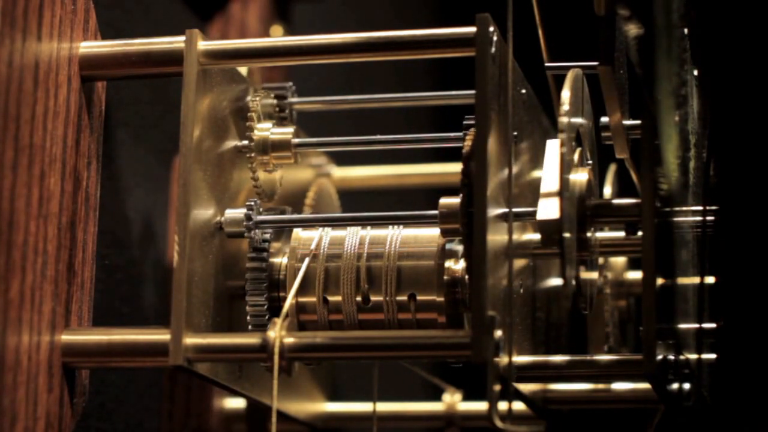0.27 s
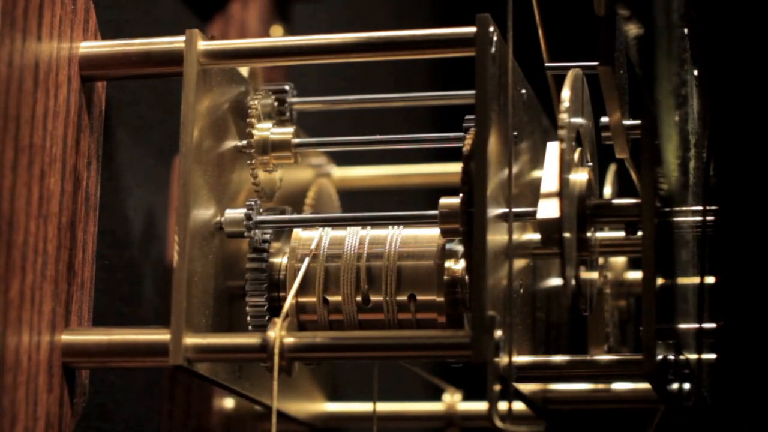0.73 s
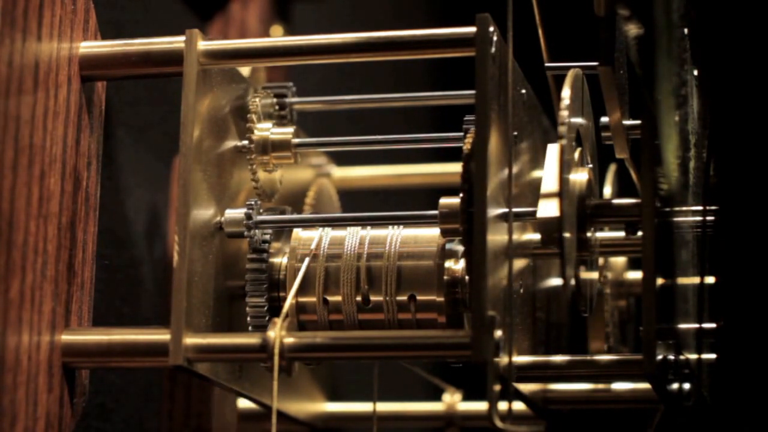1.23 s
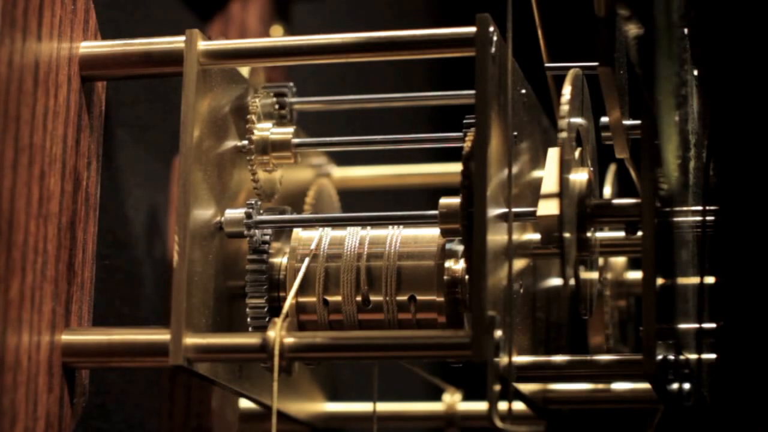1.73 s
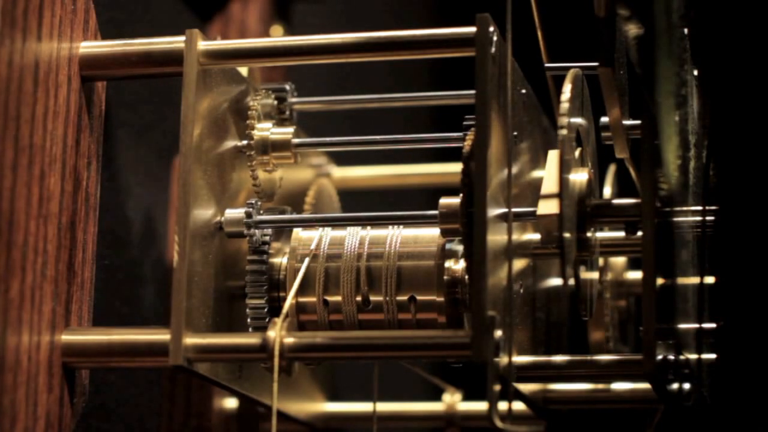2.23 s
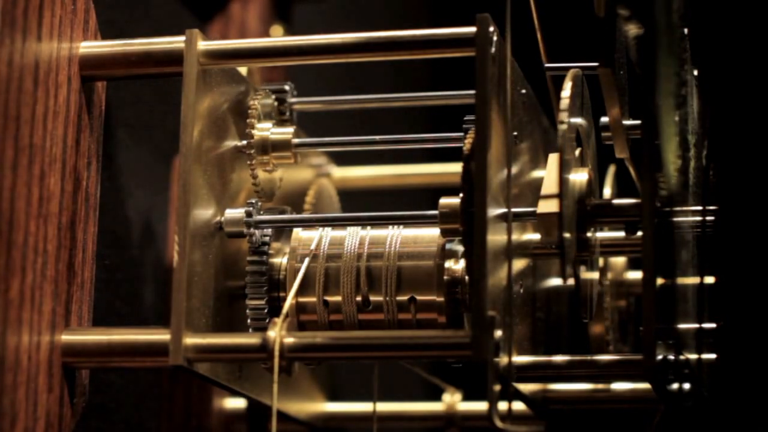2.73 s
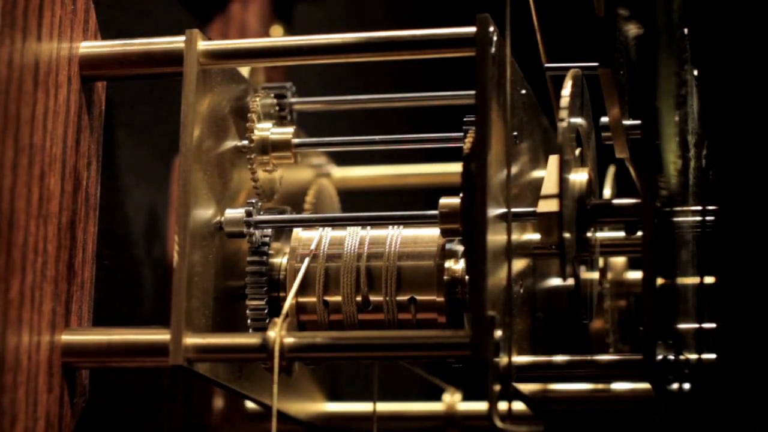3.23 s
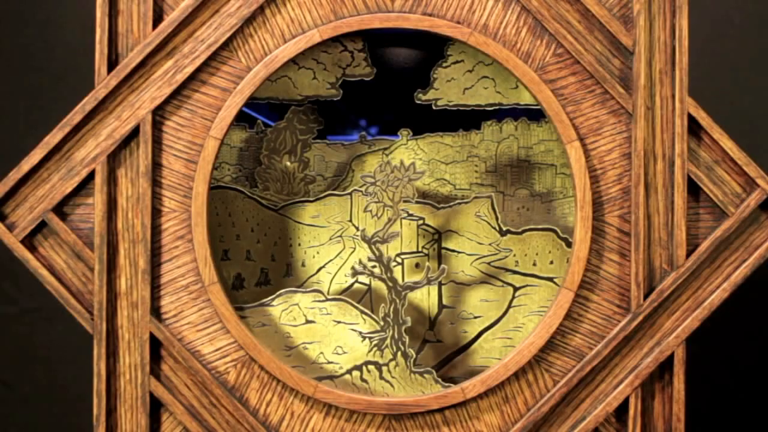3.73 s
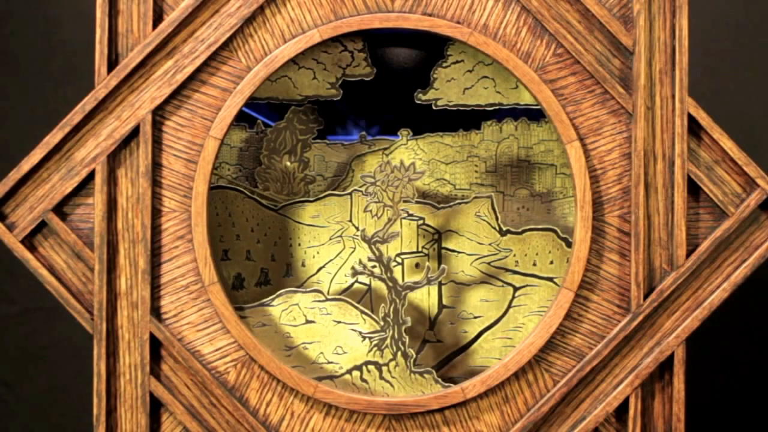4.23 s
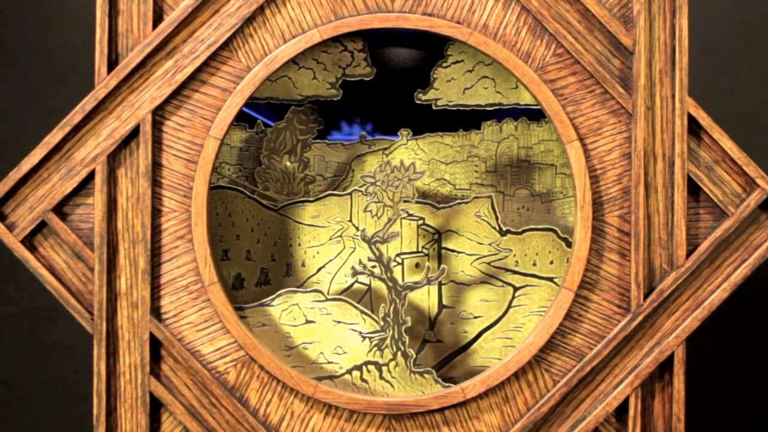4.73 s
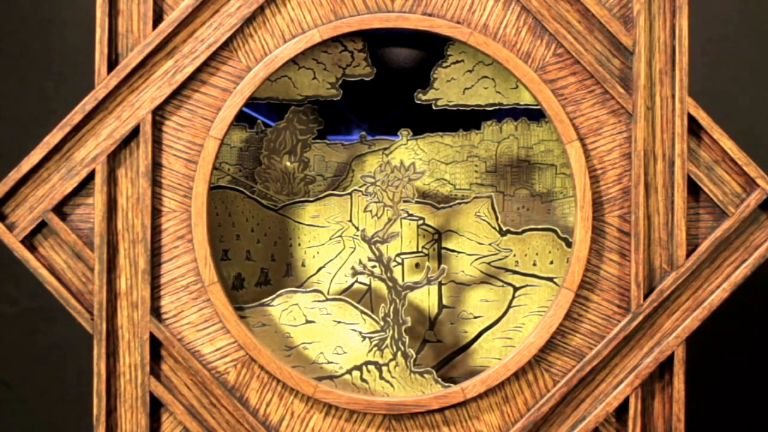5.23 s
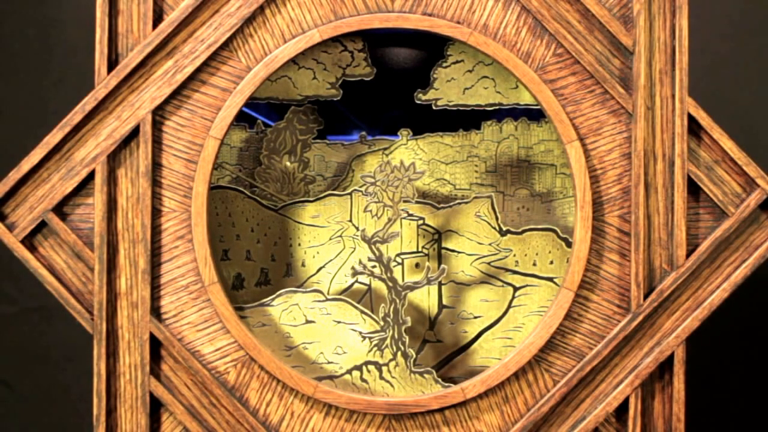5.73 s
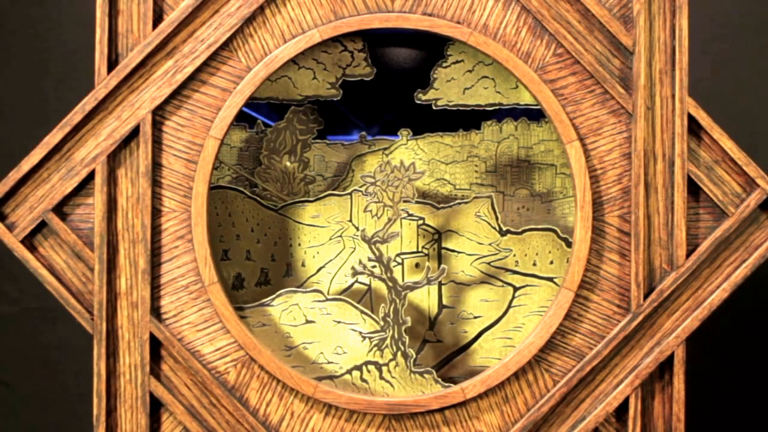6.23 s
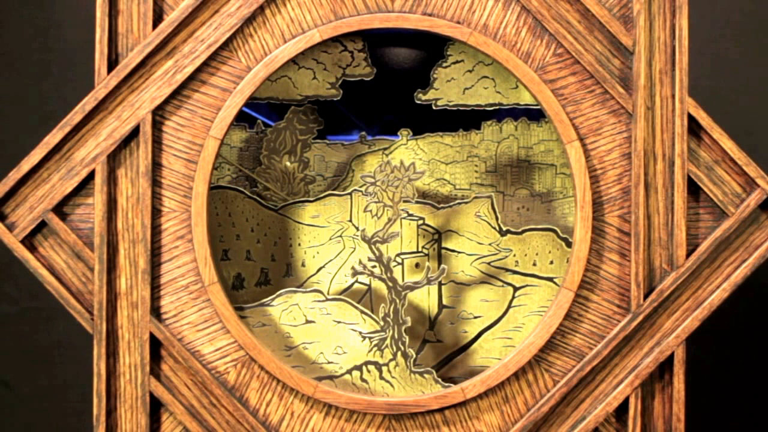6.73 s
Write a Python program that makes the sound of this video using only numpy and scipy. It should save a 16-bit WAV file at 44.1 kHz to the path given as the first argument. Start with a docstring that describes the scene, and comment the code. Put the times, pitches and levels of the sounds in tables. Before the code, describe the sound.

A mechanical clock ticks and tocks evenly up close, with sharp metallic clicks and a faint brass ring in a quiet room.

```python
"""In a quiet room, a weight-driven brass clock in a wooden case goes tick, tock close by.
At each beat a tooth of the escape wheel scrapes off one pallet (a small steel catch), drops on
the other and chatters; after a tock the wheel bounces back. The jolt knocks the case and sets
the brass frame ringing. The gears click faintly between beats, and the room adds a short echo
over a soft hiss and rumble."""
import sys
import numpy as np
from scipy import signal
from scipy.fft import rfft, irfft, next_fast_len
from scipy.io import wavfile
from scipy.ndimage import uniform_filter1d

SR = 44100
rng = np.random.default_rng(int(sys.argv[2]) if len(sys.argv) > 2 else 0)


def int16_out(signal):
    """Quantize to a 16-bit WAV file."""
    q = np.round(np.clip(np.atleast_2d(signal).T, -1, 1) * 32767)
    wavfile.write(sys.argv[1], SR, q.astype(np.int16))


N = 308239

# Levels in the tables are relative. A ring time is how long a sound takes to fade by 60 dB.
# hiss and rumble of the still room: (frequency [Hz], level [dB])
HISS_COLOUR = [(12, -5), (20, -2), (59, -1), (289, -13.5), (382, -12), (519, -15.5), (811, -18),
               (2210, -25.5), (2470, -24.5), (3750, -27.5), (5380, -27.5), (5850, -27), (7520, -27.5),
               (10500, -31), (15500, -34.5)]
RUMBLE_COLOUR = [(20, -26.5), (45, -13), (90, -20), (300, -62.5)]
# a tooth drops on the entry pallet:
# (time [s], strength [dB], first-touch boost [dB], scrape length [s], squeak level [dB])
TICK_BEATS = [(0.2693, -20, -5, 0.0037, -23), (.868, -20.5, -0.5, 0.0011, -26),
              (1.4744, -20, -4, 0.0061, -23), (2.0769, -21, 0.5, 0.0013, -20.5),
              (2.6808, -21, 1, 0.0027, -22.5), (3.2886, -21, 2.5, 0.00076, -18.5),
              (3.8914, -21.5, 1, .001, -18.5), (4.4963, -20, -3.5, .002, -19.5),
              (5.096, -20.5, 0, 0.0014, -17.5), (5.7046, -21.5, -2.5, 0.0049, -17.5),
              (6.32, -22.5, 0.5, 0.0063, -24.5), (6.935, -23, -1, 0.00093, -21.5)]
# a tooth drops on the exit pallet:
# (time [s], strength [dB], first-touch boost [dB], scrape length [s], bounce delay [s], axle level [dB])
TOCK_BEATS = [(0.5632, -19, -2, 0.0066, 0.042, -48.5), (1.1678, -19.5, -3, .008, 0.037, -53),
              (1.7698, -19, 0.5, 0.0055, 0.04, -51), (2.3742, -18.5, 1, 0.0092, 0.02, -48),
              (2.9828, -19, 2, 0.0086, .04, -42.5), (3.584, -19.5, -2, 0.0071, .029, -51.5),
              (4.1917, -19, -5, 0.0066, .04, -46), (4.7907, -20.5, 0, .009, .04, -63),
              (5.3875, -22, 6, 0.0063, 0.029, -57), (5.996, -20, 5, 0.01, 0.027, -47),
              (6.6098, -19, 2, 0.00046, 0.034, -51.5)]
# tone colour of a hit on each pallet: (frequency [Hz], level [dB])
TICK_COLOUR = [(300, -20.0), (1900, -14), (2900, -5), (3300, -4), (3800, -10), (4500, 0), (5500, -5),
               (5800, 3), (7000, -5), (7600, -2), (9000, 1), (11300, 2), (13600, -7), (15700, -8)]
TOCK_COLOUR = [(300, -20.0), (1900, -11), (2900, 0), (3300, 0), (3800, -7), (4500, -1), (5500, -4),
               (5800, -3), (7000, 7), (7600, -1), (9000, 1), (11300, 3), (13600, -6), (15700, -4)]
# pitches that each pallet and the wheel bring out: (frequency [Hz], width [Hz], boost [dB])
TICK_RESONANCES = [(2520.0, 120.0, 10), (5930.0, 160.0, 3), (6500.0, 240.0, 12), (6870.0, 310.0, 10),
                   (9230.0, 270.0, 7), (9910.0, 60.0, 6), (10550.0, 270.0, 9), (10900.0, 150.0, 9),
                   (14210.0, 90.0, 10), (14540.0, 340.0, 8)]
TOCK_RESONANCES = [(2540.0, 110.0, 8), (5710.0, 90.0, 13), (5880.0, 200.0, 14), (6190.0, 210.0, 8),
                   (6460.0, 100.0, 7), (8150.0, 100.0, 5), (9230.0, 450.0, 8), (10530.0, 150.0, 8),
                   (10880.0, 110.0, 7), (13050.0, 370.0, 8), (14340.0, 430.0, 12)]
# the tooth touches, lands and hops on each pallet: (delay [s], level [dB], thinness [dB])
TICK_HOPS = [(0, -10, 7), (.0013, 2.5, 5), (.0052, 0, 0), (.009, -10, -10.5), (0.038, -29.5, -1.5)]
TOCK_HOPS = [(0, -3, 13.5), (.003, -4.5, -4.5), (.0065, 0, 1), (.0095, -2, -4.5), (.014, -10, 0.5),
             (.026, -19, 1)]
# fuller rattle as the wheel bounces back: (delay after the bounce [s], level [dB], thinness [dB])
BOUNCE_HOPS = [(0, -16.5, -4.5), (.006, -22.5, -7.5), (.012, -22, -8.5)]
# dull knock of the case: (frequency [Hz], level [dB])
WOOD_COLOUR = [(60, -23), (170, -11.5), (300, -8), (400, 4.5), (550, -2), (720, 1), (1200, 0), (1800, -13),
               (3000, -7.5), (6000, -26.5)]
# ping of a tooth: (frequency [Hz], level [dB])
PING_COLOUR = [(11600, -40), (12050, 0), (12400, 0), (13000, -11), (13500, -40)]
# tones that each part rings with when struck: (frequency [Hz], level [dB], ring time [s])
CASE_TONES = [(120, -20.5, .35), (233.6, -6, 0.2), (384.4, -5, 0.22), (467.6, -12, 0.19),
              (505.3, -15, 0.033), (620, -6.5, 0.1), (684, 5.5, 0.035), (875.4, 0, 0.08), (974, 0, 0.036),
              (1238, -12, 0.076)]  # wooden panels and the hollow inside
TOOTH_TONES = [(12085, -33.5, 0.33), (12100, -35.5, .2), (12350, -28, .15)]  # teeth of the escape wheel
FRAME_TONES = [(1127, -8, .45), (1623, -14, .4), (2309, -13, .38), (2446, -10, .38), (2850, -8, .38),
               (3579, -11, .38), (4155, -10, .35), (4812, -13, .35), (5100, -9, .36), (5359, -10, .35),
               (6029, -8, .32), (6473, -1, .3), (8115, -13, .3), (8188, -10, .32), (9948, -10, .28),
               (10260, -7, .28), (10925, -12, .25), (11937, -10, .25), (12085, -7, .25)]  # brass plates and pillars
AXLE_TONES = [(5682, 0, .37)]  # one steel axle
# how long the room echoes: (frequency [Hz], ring time [s])
ECHO_TIMES = [(150, 0.61), (500, 0.34), (1500, 0.31), (4000, 0.26), (8000, 0.21), (15000, 0.62)]
# tone colour of the echo: (frequency [Hz], level [dB])
ECHO_COLOUR = [(100, 1.5), (300, -1), (1000, -4.5), (2500, -11.5), (6000, -13), (10000, -24), (15000, -36)]
# click of the gears taking up their slack: (time of the tock [s], level [dB])
SLACK_LEVELS = [(2.4, -51), (3.0, -53), (3.6, -47), (5.4, -40.5), (6.0, -45.5), (6.6, -59)]
# gear teeth slipping into place: (time [s], level [dB])
GEAR_SLIPS = [(2.8687, -42), (2.8818, -43), (2.8918, -32.5), (4.084, -43.5), (4.1014, -40)]
# lower ring of a gear wheel: (frequency [Hz], level [dB])
GEAR_COLOUR = [(500, -0.5), (1800, -7.0), (2600, 2.5), (3300, -10.5), (5000, 1.5), (10000, -30.0)]

TIME = np.arange(SR // 2) / SR  # the half second that one hit is given to ring [s]


def amp(db):
    """Turn decibels into a gain to multiply by."""
    return 10 ** (np.asarray(db) / 20)


def unit(x):
    """Scale a sound to an average (rms) size of 1."""
    return x / np.sqrt(np.mean(x ** 2) + 1e-20)


def along(points, hz):
    """Read between the rows of a (frequency, value) table, on a pitch-like log scale."""
    freqs, values = np.transpose(points)
    return np.interp(np.log(hz + 1), np.log(freqs + 1), values)


def noise(colour, peaks=(), size=len(TIME)):
    """Noise with a smooth tone colour and resonant peaks on top."""
    hz = np.fft.rfftfreq(size, 1 / SR)
    boost_db = sum(lift / (1 + (2 * (hz - f) / width) ** 2) for f, width, lift in peaks)
    phases = np.exp(2j * np.pi * rng.random(len(hz)))
    return unit(irfft(amp(along(colour, hz) + boost_db) * phases, size))


def fade(ring_s):
    """A struck part dies away by 60 dB in ring_s seconds."""
    return np.exp(-np.log(1000) * TIME / ring_s)


def ring(tones, scatter_db):
    """Fading tones, their levels scattered at random; neighbours start in opposite directions."""
    out = np.zeros(len(TIME))
    for k, (hz, db, ring_s) in enumerate(tones):
        gain = (-1) ** k * amp(db + scatter_db * rng.standard_normal())
        out += gain * fade(ring_s) * np.sin(2 * np.pi * hz * TIME)
    return out


def add(track, s, sound):
    """Mix a sound into the track at s seconds."""
    start = max(round(s * SR), 0)
    track[start:start + len(sound)] += sound[:max(N - start, 0)]


def background():
    """Faint hiss, a low rumble near 45 Hz and, at the start, the dying ring of a tock."""
    air = amp(-60.5) * noise(HISS_COLOUR, size=N)
    rumble = amp(-61.5) * noise(RUMBLE_COLOUR, peaks=[(45.7, 12, 13)], size=N)
    brass = amp(-55) * ring(FRAME_TONES, scatter_db=3)
    tock_tail = amp(-51.5) * (noise(TOCK_COLOUR) + noise(WOOD_COLOUR)) * fade(.4)
    add(air, 0, brass + tock_tail)
    return air + rumble


def contact(colour, peaks, ring_s, thin_db):
    """Steel hits steel: a crack, then a short ring. A glancing, thin touch lacks the lower tones."""
    dip = (2500, 3500, -thin_db)
    return noise(colour, [*peaks, dip]) * (fade(ring_s) + .3 * fade(.006))


def beat(bite_db, scrape_s, hops, pallet, scrape_db, ring_s):
    """A tooth scrapes briefly, then lands in a cluster of hops, no two quite alike."""
    out = np.zeros(N)
    add(out, 0, amp(scrape_db) * noise(*pallet) * (TIME < scrape_s))
    for delay, db, thin_db in hops:
        late, hard = rng.standard_normal(2)
        hop_s = scrape_s + delay * (1 + .025 * late)
        hop_db = db + bite_db * (delay < .004) + .6 * hard  # the first 4 ms are the first touch
        add(out, hop_s, amp(hop_db - 3) * contact(*pallet, ring_s, thin_db))
    return out


def escapement():
    """The two pallets stop the wheel in turn, tick and tock; it bounces back after every tock."""
    out = np.zeros(N)
    entry_pallet, exit_pallet = (TICK_COLOUR, TICK_RESONANCES), (TOCK_COLOUR, TOCK_RESONANCES)
    for s, db, bite_db, scrape_s, _ in TICK_BEATS:
        tick = beat(bite_db, scrape_s, TICK_HOPS, entry_pallet, scrape_db=-26.5, ring_s=.055)
        add(out, s - scrape_s, amp(db) * tick)
    for s, db, bite_db, scrape_s, bounce_s, _ in TOCK_BEATS:
        hops = TOCK_HOPS + [(bounce_s + delay, *hop) for delay, *hop in BOUNCE_HOPS]
        tock = beat(bite_db, scrape_s, hops, exit_pallet, scrape_db=-24.5, ring_s=.051)
        add(out, s - scrape_s, amp(db) * tock)
    return out


def case():
    """The jolt of the stopping wheel reaches the wooden case, which knocks and hums briefly."""
    out = np.zeros(N)
    for beats, jolt_db in (TICK_BEATS, -1.5), (TOCK_BEATS, -1.26):
        for s, db, *_ in beats:
            add(out, s, amp(db + jolt_db - 27) * noise(WOOD_COLOUR) * fade(.15))
            add(out, s + .0045, amp(db + jolt_db - 18.5) * noise(WOOD_COLOUR) * fade(.072))
            add(out, s + .00412, amp(db + jolt_db - 24.5) * ring(CASE_TONES, scatter_db=.5))
    return out


def squeak(swell_s, rough):
    """A tooth pings, then squeaks upward in pitch as it slides onto the pallet."""
    pitch_hz = 12250 + 450 * np.clip(TIME / swell_s - .5, 0, 1.5)
    wobble = rough * unit(uniform_filter1d(rng.standard_normal(len(TIME)), size=90))
    swell = np.exp(-((TIME - swell_s) / .007) ** 2)
    slide = swell * np.sin(2 * np.pi * np.cumsum(pitch_hz) / SR + wobble)
    ping = noise(PING_COLOUR) * fade(.04)
    return amp(-2.5) * ping + amp(-12) * slide


def frame(tilt_db_per_octave):
    """The brass frame struck once; its ring is tilted brighter for ticks and duller for tocks."""
    tones = [(hz, db + tilt_db_per_octave * np.log2(hz / 4000), ring_s) for hz, db, ring_s in FRAME_TONES]
    return ring(tones, scatter_db=3)


def ringing_metal():
    """The teeth squeak and ring on each tick; every beat sets the frame and one axle ringing."""
    out = np.zeros(N)
    for s, db, *_, squeak_db in TICK_BEATS:
        teeth = squeak(swell_s=.015, rough=.5) + ring(TOOTH_TONES, scatter_db=3.5)
        add(out, s + .0006, amp(squeak_db) * teeth)
        brass = amp(db - 31) * frame(tilt_db_per_octave=2.5)
        axle = amp(-56.5) * ring(AXLE_TONES, scatter_db=0)
        add(out, s + .0044, brass + axle)
    for s, db, *_, axle_db in TOCK_BEATS:
        brass = amp(db - 32.5) * frame(tilt_db_per_octave=-1)
        axle = amp(axle_db) * ring(AXLE_TONES, scatter_db=.5)
        add(out, s + .005, brass + axle)
    return out


def room(clock):
    """The room gives each beat its own soft, dull echo; the tock carries further."""
    out = np.zeros(N)
    edges = [0] + [round((s - .02) * SR) for s, *_ in sorted(TICK_BEATS + TOCK_BEATS)[1:]] + [N]
    build_up = 1 - np.exp(-TIME / .0014)
    for k, (start, end) in enumerate(zip(edges, edges[1:])):
        hz, t, noise_bands = signal.stft(rng.standard_normal(len(TIME)), SR, nperseg=256)
        decay = np.exp(-np.log(1000) * t / along(ECHO_TIMES, hz)[:, None])
        energy = np.mean(decay ** 2, axis=1) * len(TIME)
        decay *= (amp(along(ECHO_COLOUR, hz)) / np.sqrt(energy))[:, None]
        tail = signal.istft(noise_bands * decay, SR, nperseg=256)[1][:len(TIME)] * build_up
        echo_db = -1.5 + 3.95 * (k % 2)  # every second beat is a tock
        add(out, start / SR + .004, amp(echo_db) * signal.fftconvolve(clock[start:end], tail))
    return out


def gears():
    """The gears take up their slack with a dry click after each tock; now and then a tooth slips in."""
    out = np.zeros(N)
    slack = [(s + .198, np.interp(s, *np.transpose(SLACK_LEVELS)), -28) for s, *_ in TOCK_BEATS]
    slips = [(s, db, 0) for s, db in GEAR_SLIPS]
    for s, db, ring_db in slack + slips:
        click = contact(TOCK_COLOUR, TOCK_RESONANCES, ring_s=.036, thin_db=-6.5)
        wheel = noise(GEAR_COLOUR) * fade(.045)
        axle = amp(-24) * ring(AXLE_TONES, scatter_db=6.5)
        add(out, s, amp(db - 10.5) * (click + amp(ring_db) * (wheel + axle)))
    return out


def scene():
    """The clock in its room, as one channel."""
    clock = escapement() + ringing_metal() + case() + gears()
    return (clock + room(clock) + background())[None]


def record(dry):
    """Cut away the very highest treble."""
    top_hz = 15800
    size = next_fast_len(N + SR // 2)
    hz = np.fft.rfftfreq(size, 1 / SR)
    return irfft(rfft(dry, size) / np.sqrt(1 + (hz / top_hz) ** 200), size)[:, :N]


dry = scene()
out = record(dry)
int16_out(out)
```